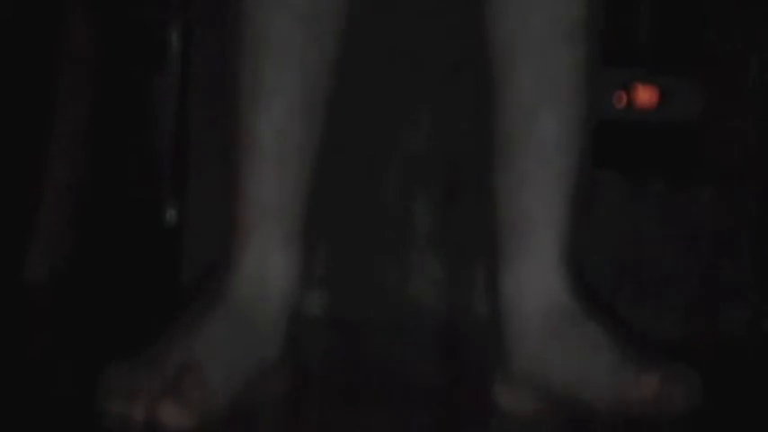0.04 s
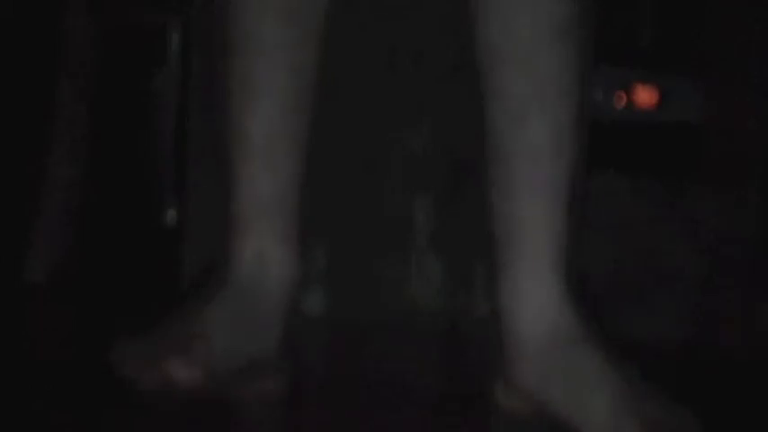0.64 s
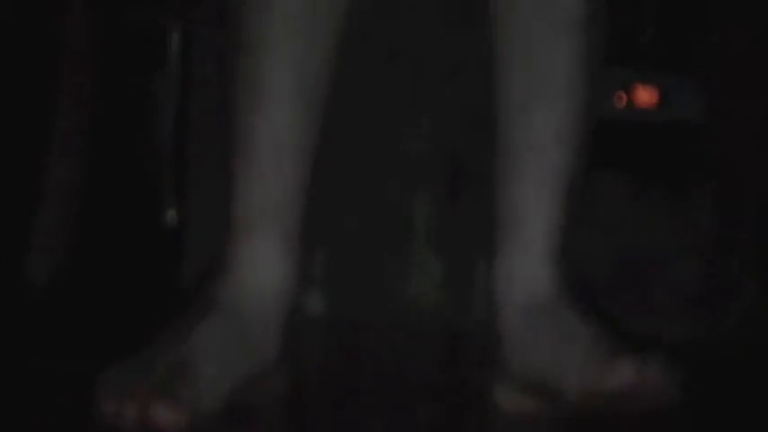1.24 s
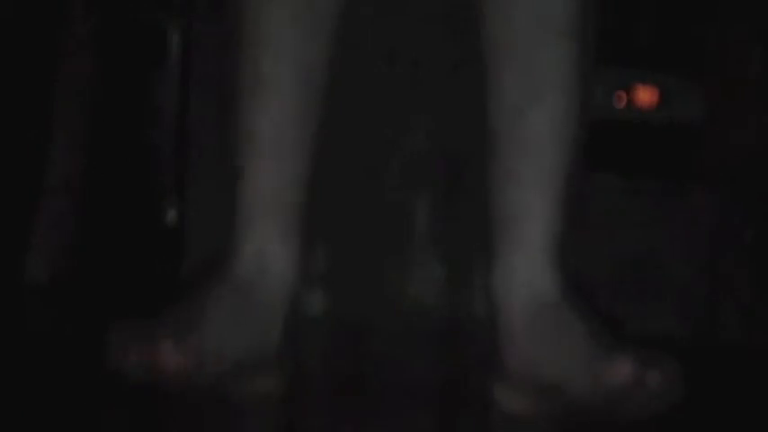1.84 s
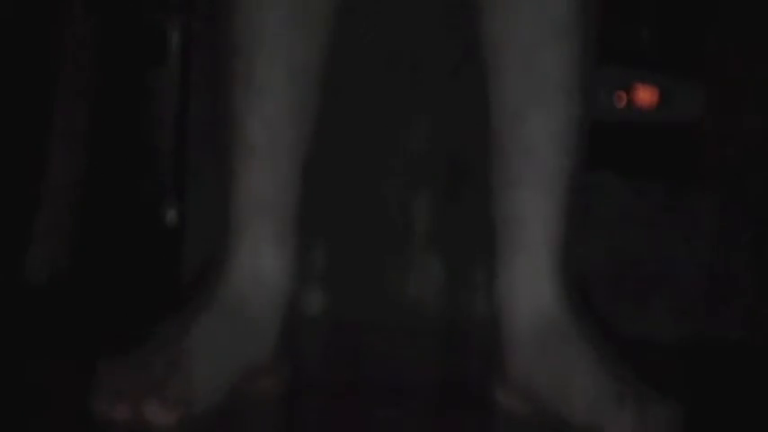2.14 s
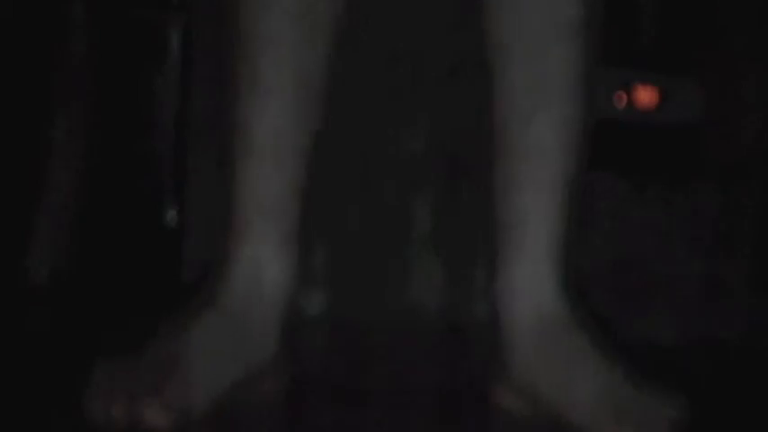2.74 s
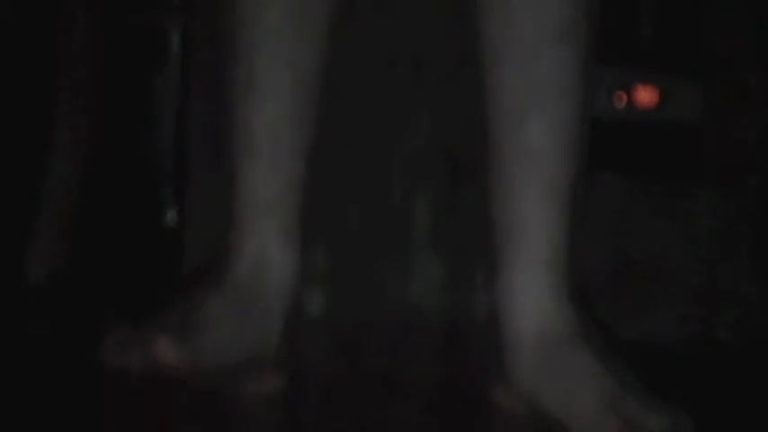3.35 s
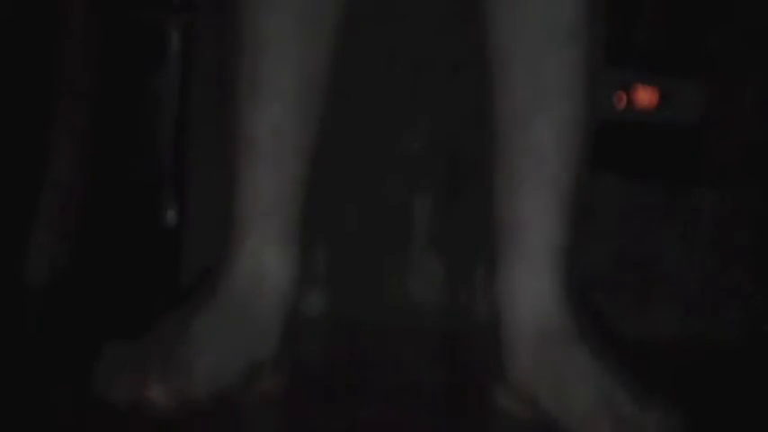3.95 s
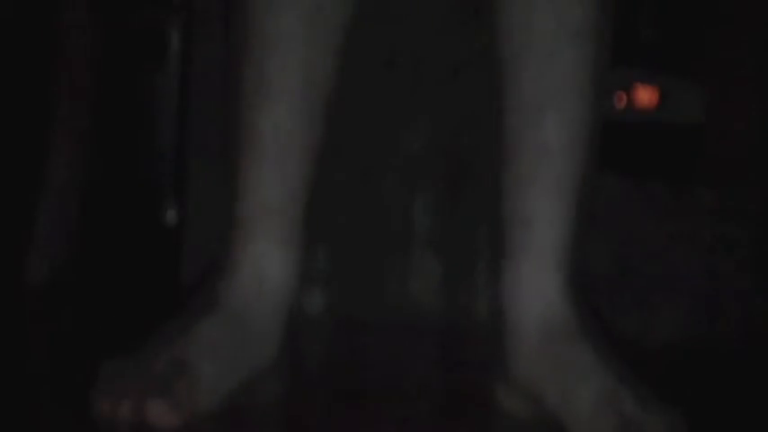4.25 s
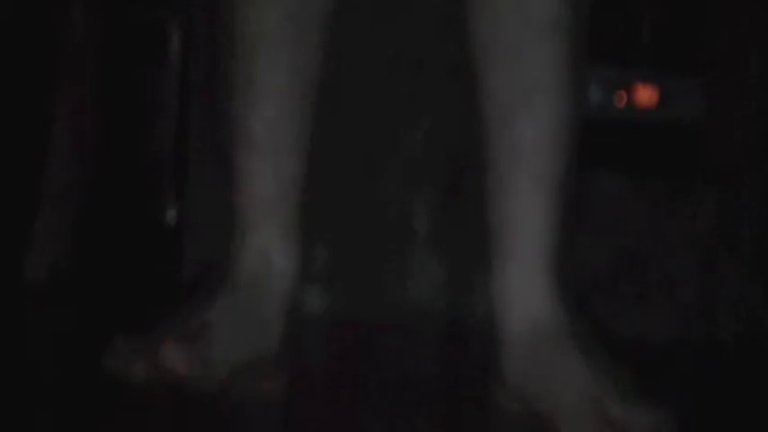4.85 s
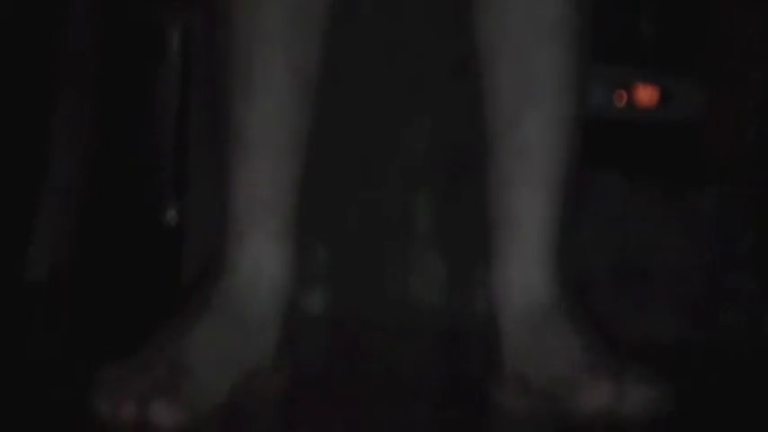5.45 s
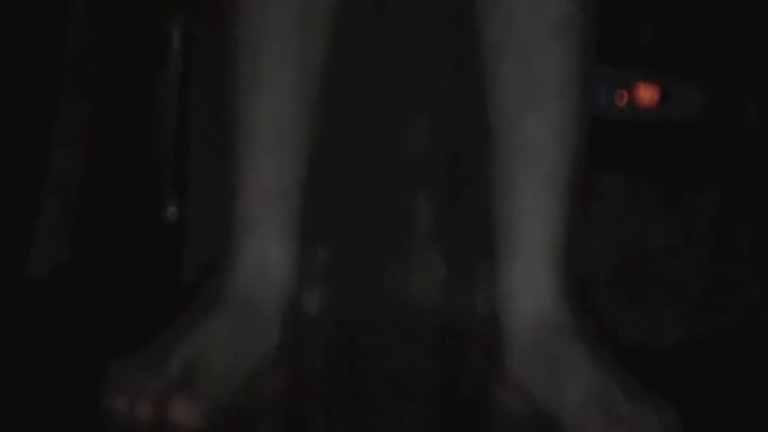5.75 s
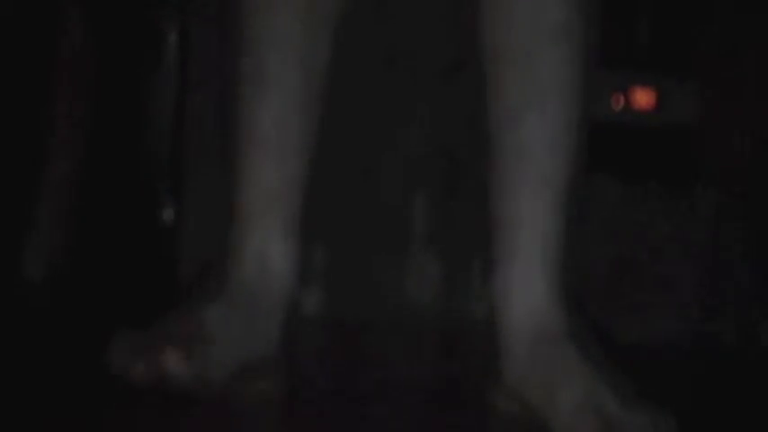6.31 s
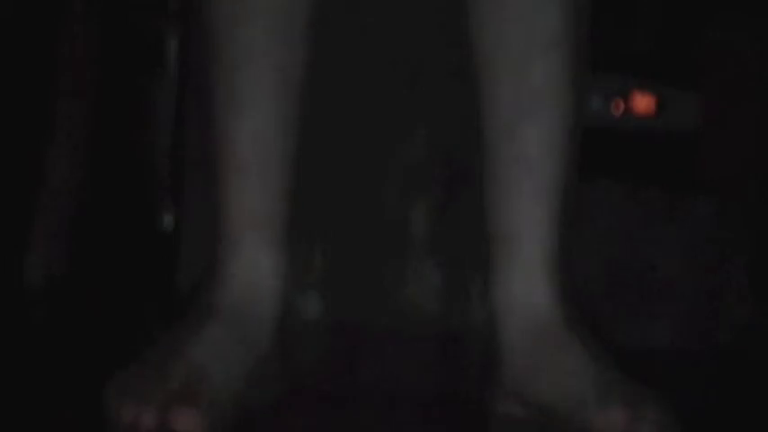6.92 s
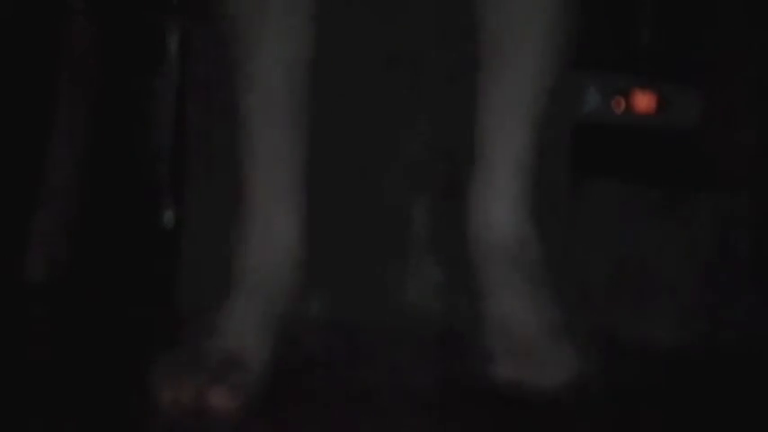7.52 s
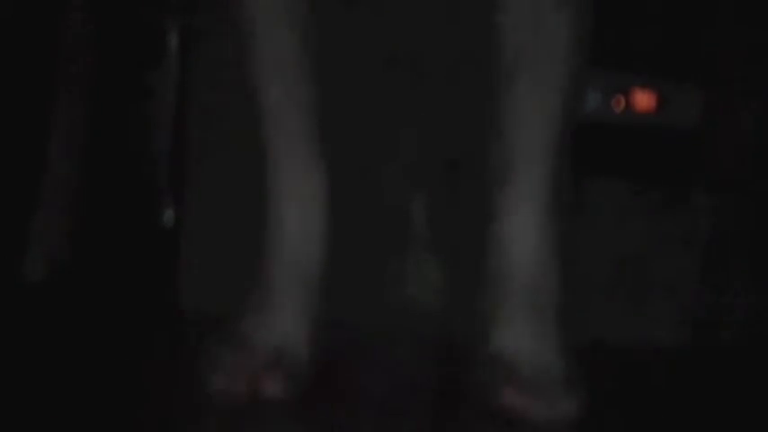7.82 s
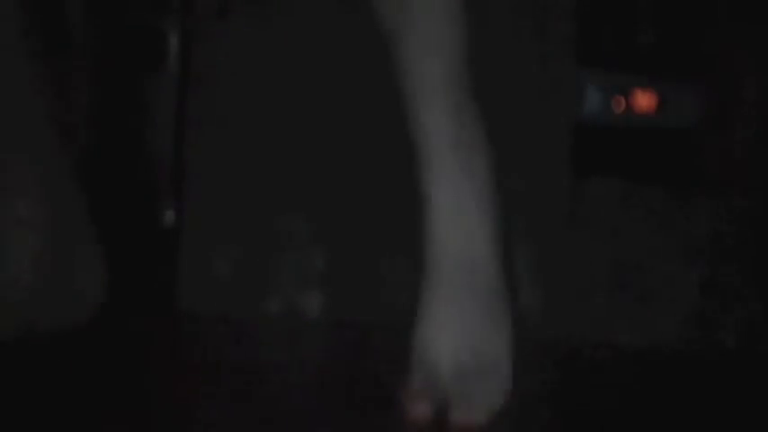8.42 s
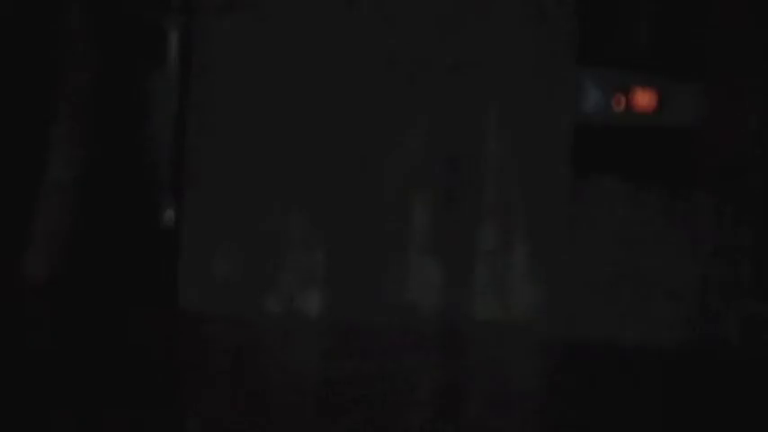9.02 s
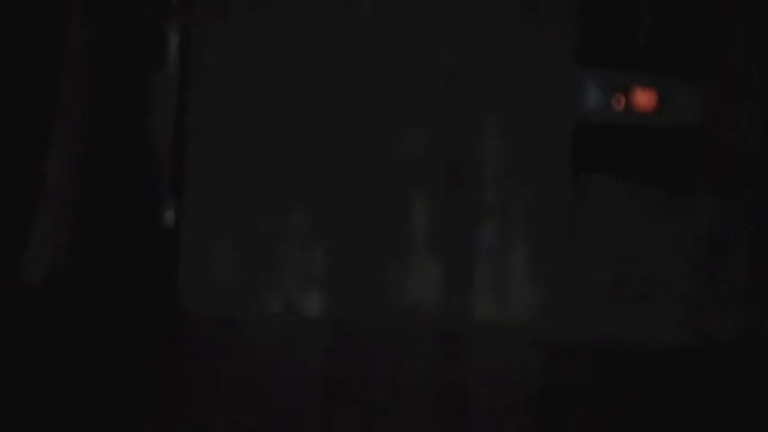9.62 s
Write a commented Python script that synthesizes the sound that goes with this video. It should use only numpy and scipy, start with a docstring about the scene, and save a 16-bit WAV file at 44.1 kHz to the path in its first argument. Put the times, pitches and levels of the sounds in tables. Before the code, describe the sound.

Light, uneven pats of bare feet in a small room give way to heavy footsteps walking away.

```python
"""Bare feet tap a hard floor in a small room, then walk off past the microphone with heavy heel thuds.
Each sole squeezes out a puff of air and shakes the floor; the skin smacks on the taps and brushes on the steps.
Near walls answer within milliseconds; the mono microphone hisses and whines faintly."""
import sys
import numpy as np
from scipy import signal
from scipy.fft import rfft, irfft, next_fast_len
from scipy.io import wavfile
from scipy.ndimage import uniform_filter1d

SR = 44100
rng = np.random.default_rng(int(sys.argv[2]) if len(sys.argv) > 2 else 0)


def unload_audio(sound):
    """Save the sound as a 16-bit wav file, at the path given as the first command line argument."""
    columns = np.transpose(np.atleast_2d(sound))
    # keep every value between -1 and 1, then stretch to whole-number steps
    steps = np.round(np.clip(columns, -1, 1) * 32767)
    wavfile.write(sys.argv[1], SR, steps.astype(np.int16))


N = 426447

# the sole lands flat and smacks: (s, skin click dB, clap of the arch dB, clap pitch Hz)
SMACKS = [(0.0511, -34.5, -43, 2200), (0.2825, -35.5, -70, 2700), (.547, -29.5, -44, 3600), (.617, -39.5, -66, 2500), (.9676, -28.5, -49, 3200),
          (1.2093, -26, -34, 5330), (1.403, -43, -51, 3730), (1.9649, -31.5, -41.5, 2700), (2.069, -38.5, -60, 1800),
          (2.1905, -30, -41, 4320), (2.428, -39, -54, 1900), (2.5037, -49, -52, 1800), (3.135, -36, -37.5, 3000),
          (3.5544, -26, -41, 3900), (3.8615, -40, -33, 2950), (4.2371, -55, -30, 4160), (4.6073, -44, -53, 2600),
          (4.9754, -31.5, -54, 3000), (5.4095, -29, -44, 2700), (5.6252, -43, -57, 2300), (6.4963, -43.5, -48, 2100)]
# skin brushing over the floor: (s at the peak, level dB, rise s, fall s, grip: low rasp against high hiss dB)
BRUSHES = [(7.038, -43.5, .005, .005, -3), (7.161, -34.5, 0.0009, .0045, -4.5), (7.336, -47, 0.005, 0.0098, 4), (7.36, -39, 0.0022, .01, -2),
           (7.42, -39.5, 0.0097, 0.0063, -3.5), (7.6, -31, .0006, 0.0067, -4.5), (7.635, -45.5, 0.021, 0.031, 9), (7.68, -42, .011, .01, -15),
           (7.786, -42, 0.0042, .0045, 1.5), (7.888, -38, .009, .004, -7), (7.92, -45, 0.017, .015, -2), (8.038, -38, 0.018, 0.012, -1),
           (8.206, -51, .006, 0.029, 3), (8.316, -42.5, 0.029, 0.024, 0), (8.423, -34, 0.00093, 0.0072, 0), (8.562, -43, 0.013, 0.033, -1),
           (8.673, -31, .0004, 0.021, -2), (8.909, -29.5, .0007, 0.027, -6.5), (8.965, -38.5, .0025, 0.02, -4.5),
           (9.13, -28, 0.0073, 0.0052, -15), (9.391, -33.5, .008, 0.017, -8), (9.447, -49.5, 0.011, 0.0056, 13.5)]
# modes of the floor and the room above it: (Hz, dB, t60 s)
FLOOR_MODES = [(73.4, 2, 0.25), (88.4, 1, 0.18), (120.3, -0.5, 0.14), (171.7, -4.5, 0.16), (194.8, -16.5, 0.48), (248.7, -2, 0.13), (284, -11, 0.24), (337.5, -6, 0.18), (402, -4.5, 0.12)]
# early reflections: (delay s, dB)
WALLS = [(.0038, -14), (.0072, -18), (0.0099, -27), (0.016, -15.5), (0.024, -41)]
# diffuse room sound: (Hz, dB against the direct sound, t60 s)
ROOM = [(40, -12, 0.45), (127, -11, 0.68), (279, -12, 0.16), (607, -10, 0.46), (1230, -5, 0.33), (2420, -3.5, 0.43), (4970, -9.5, 0.39), (8700, -7.5, 0.095), (15000, -8, 0.16)]
# steady background: (Hz, dB per Hz)
HISS = [(12, -21), (20, 8.5), (27, -5.5), (92, -8.5), (174, -4), (205, -6.5), (357, -11.5), (409, -9.5), (445, -9),
        (484, -13), (1020, -17.5), (1140, -17.5), (1550, -18), (3360, -18.5), (15000, -19.5)]
HISS_DB = -48.5
WHINE_HZ = 7867  # fixed
WHINE_DB = -65
CUTOFF_HZ = 15400  # fixed
TIME = np.arange(N) / SR
# the whole floor span bending under the weight: (Hz, dB, t60 s)
SAG_MODES = [(20.7, -5, 0.3), (37.4, -3.5, 0.4)]
# short, hollow ringing of the hard floor surface: (Hz, dB, t60 s)
SURFACE_MODES = [(599, -45, 0.11), (669, -45.5, 0.057), (1610, -41, 0.051), (1780, -47, 0.2), (2147, -55, 0.41), (3280, -77, 0.35), (3430, -50.5, 0.27), (3640, -51, 0.19), (4040, -72.5, 0.17)]
# the forefoot pats the floor: (s, air puff dB, weight dB)
TAPS = [(.0508, -12.5, -42.5), (0.283, -22, -40), (.546, -24.5, -50), (.618, -31, -39), (.966, -13.5, -46.5), (1.207, -15.5, -54),
        (1.404, -34, -41), (1.9645, -11, -42.5), (2.0691, -18.5, -39), (2.1877, -25.5, -41.5), (2.4285, -27.5, -41.5),
        (2.5038, -21.5, -58), (2.7787, -32.5, -51), (3.134, -17, -45.5), (3.5539, -16.5, -40.5), (3.7905, -30, -51.5), (3.8614, -9.5, -42),
        (4.188, -29.5, -51), (4.2366, -16.5, -40), (4.5498, -26, -46), (4.6074, -23.5, -48.5), (4.8862, -31.5, -51), (4.9738, -18, -48),
        (5.057, -33.5, -72), (5.4099, -16, -49.5), (5.623, -26.5, -52), (5.7689, -29, -50), (6.065, -23.5, -47.5), (6.197, -34, -58),
        (6.4942, -23, -54), (6.7934, -40, -51), (6.892, -51, -54.5), (7.1609, -31, -48), (7.325, -27, -64), (7.357, -28, -69),
        (7.4217, -13.5, -35.5), (7.6315, -15.5, -47), (7.7884, -23, -59), (7.8815, -11, -33), (8.024, -25, -49), (8.303, -30, -63),
        (8.349, -25, -47), (9.13, -26.5, -47)]
TAP_HZ, AIR_OVER_WEIGHT_DB, DB_PER_OCTAVE = 283.5, 24, 67   # pitch of a usual tap; an airier one is higher, a heavier one deeper
TAP_WEIGHT_DB, TAP_PATTER_DB, TAP_PATTER_GROWTH = -45, -43.5, 0.67   # a usual tap, the patter of its flesh, dB more per dB of weight
TAP_SAG_DB, SAG_GROWTH = -36.5, .6   # the floor sags fully under a usual tap, less under lighter ones
# a heel comes down: (s, air puff dB, puff pitch Hz, weight dB)
HEELS = [(1.748, -56, 130, -55), (7.2387, -14, 72, -30.5), (7.669, -34, 111, -34.5), (7.6891, -31, 120, -33), (8.06, -31, 83, -37.5), (8.12, -4, 187, -30.5),
         (8.3569, -20, 109, -34.5), (8.4266, -13.5, 142, -23.5), (8.5601, -17, 122, -22.5), (8.6778, -5.5, 158, -20),
         (8.9108, -27, 120, -21.5), (8.9783, -23, 84, -56), (9.162, -20.5, 204, -44), (9.395, -38, 150, -43)]
HEEL_WEIGHT_DB, HEEL_PATTER_DB, HEEL_PATTER_GROWTH = -20.5, -39.5, 2.9   # a full stride, its patter, dB more per dB of weight
HEEL_SAG_DB = -38
PATTER_WITH_AIR = 0.32   # dB of patter per dB of puff over weight: a flat landing patters more
# skin ticks as it peels off the floor: (s, dB)
PEELS = [(7.3569, -43), (7.6037, -33), (7.891, -35), (8.2342, -32), (8.9492, -34.5), (9.4825, -42)]
GRIP_DB = None
GRIP_FALL = None
CUSHION_FROM_DB, CUSHION_SLOPE = -42, 0.84   # above this clap, trapped air cushions the flesh: dB less patter per dB of clap
WALK_OFF_S = 7.5  # fixed
STIFF_FLOOR_DB = -3   # away from the standing spot the floor sags less
CLAP_DB = None
CLAP_HZ = None
CLAP_DB_PER_OCTAVE = None
ROLLED_LANDING_DB = 3.5   # a foot that rolls down without a smack patters this much less


def from_db(db):
    """Decibels to gain."""
    return 10 ** (np.asarray(db) / 20)


def rms_one(x):
    """Scale to unit power."""
    return x / np.sqrt(np.mean(x ** 2) + 1e-20)


def band(x, low_hz, high_hz, order=2):
    """Butterworth band-pass."""
    return signal.sosfilt(signal.butter(order, [low_hz, min(high_hz, .48 * SR)], "band", fs=SR, output="sos"), x)  # fixed


def at_hz(rows, hz, axis=1):
    """Read one column of a table on a log-frequency axis."""
    rows = np.array(rows)
    return np.interp(np.log(hz), np.log(rows[:, 0]), rows[:, axis])


def add(track, s, sound):
    """Mix a sound in from time s."""
    start = max(round(s * SR), 0)
    track[start:start + len(sound)] += sound[:N - start]


def ring(force, hz, t60):
    """A unit impulse sets a cosine of height 1 ringing; a steady force radiates nothing."""
    r, w = from_db(-60 / (t60 * SR)), 2 * np.pi * hz / SR  # fixed
    return signal.lfilter([.5, 0, -.5], [1, -2 * r * np.cos(w), r * r], force + 1e-18)


def puffs(swell=0.17, swell_s=0.005, ring_s=0.0029, ring_hz=300, soft_cycles=0.31, puff_db=2.5):
    """Pressure swells under the closing sole, flips at contact and swings out within a cycle or two."""
    out, t, lead = np.zeros(N), TIME[:SR // 10], TIME[SR // 50:0:-1]
    for s, db, hz, *_ in footfalls():
        slow = np.sqrt(ring_hz / hz)   # a deep puff builds and fades more slowly
        closing = -swell * slow * np.exp(-lead / (swell_s * slow)) * np.tanh(2 * np.pi * hz * lead / (swell * slow))
        swing = np.sin(2 * np.pi * hz * t) * np.exp(-t / (ring_s * slow))
        rounded = uniform_filter1d(np.concatenate([closing, swing]), max(int(soft_cycles * SR / hz), 1))   # soft flesh blunts the corner
        add(out, s - lead[0], from_db(db + puff_db) * rounded)
    return out


def thuds(push_cycles=0.53, push_lag_cycles=0.36, thud_db=6, sag_db=5, sag_s=0.0086, thud_low_hz=52):
    """The weight lands as a soft push, longer for a heel than for the toes; the floor rings and sags."""
    force, load, t = np.zeros(N), np.zeros(N), TIME[:SR // 20]
    bend = np.sin(np.pi * np.minimum(t / sag_s, 1)) ** 2
    for s, _, hz, push_db, load_db, _ in footfalls():
        length, hardest = push_cycles / hz, s + push_lag_cycles / hz
        push = np.sin(np.pi * np.minimum(t / length, 1)) ** 2
        add(force, hardest - length / 2, from_db(push_db + thud_db) * push / push.sum())
        add(load, hardest - sag_s / 2, from_db(load_db + sag_db) * bend / bend.sum())
    force = band(force + 1e-18, thud_low_hz, 6000)   # the floor radiates little below its lowest mode
    ringing = sum(from_db(db) * ring(force, hz, t60) for hz, db, t60 in FLOOR_MODES)
    return ringing + sum(from_db(db) * ring(load, hz, t60) for hz, db, t60 in SAG_MODES)


def pats(pat_db=6, fall_s=0.0053, low_hz=310, high_hz=800):
    """The flesh settles in a short dull patter after each contact."""
    out, t = np.zeros(N), TIME[:SR // 10]
    for s, *_, db in footfalls():
        add(out, s, from_db(db + pat_db) * rng.standard_normal(len(t)) * np.exp(-t / fall_s))
    patter = band(band(out + 1e-18, low_hz, high_hz, order=1), 206, 1460)
    return patter * np.sqrt(SR / 2 / (high_hz - low_hz))


def smacks(click_db=22, click_low_hz=1200, click_high_hz=11000, clap_db=28, clap_t60=0.00045, low_mode=0.58, low_share=0.16):
    """A sharp click of skin, and a clap from the air pocket under the arch."""
    clicks, claps, t = np.zeros(N), np.zeros(N), TIME[:SR // 50]
    for s, db in skin_clicks():
        add(clicks, s, [from_db(db + click_db)])
    for s, _, pocket_db, hz in SMACKS:
        pocket = np.cos(2 * np.pi * hz * t) + low_share * np.cos(2 * np.pi * hz * low_mode * t)   # two leaky air modes
        add(claps, s, from_db(pocket_db + clap_db) * pocket * np.exp(-np.log(1000) * t / clap_t60))
    return band(clicks + 1e-18, click_low_hz, click_high_hz, order=1), band(claps + 1e-18, 600, 12500, order=1)


def brushes(grain_db=5.5, hiss_low_hz=8500, rasp_low_hz=500, rasp_high_hz=7000, rasp_db=-3, rub_db=-4, rub_low_hz=250, rub_high_hz=750):
    """Dry skin slides with a fine, high hiss; where it grips, a lower rasp and a dull rub join in."""
    hiss, grip = np.zeros(N), np.zeros(N)
    t = TIME[:SR // 2] - TIME[SR // 4]
    for s, db, rise, fall, grip_db in BRUSHES:
        stroke = from_db(db) * np.exp(-np.where(t < 0, -t / rise, t / fall))
        add(hiss, s + t[0], stroke)
        add(grip, s + t[0], stroke * from_db(grip_db))
    grains = rng.standard_normal((3, N)) * from_db(grain_db * rms_one(uniform_filter1d(rng.standard_normal(N), size=30)))
    rasp = from_db(rasp_db) * rms_one(band(grains[1], rasp_low_hz, rasp_high_hz, order=1))
    rub = from_db(rub_db) * rms_one(band(grains[2], rub_low_hz, rub_high_hz))
    return hiss * rms_one(band(grains[0], hiss_low_hz, 17600)) + grip * (rasp + rub)


def reflections(x):
    """The direct sound and its first returns from near surfaces."""
    return x + sum(from_db(db) * np.interp(TIME - delay, TIME, x, left=0) for delay, db in WALLS)


def reverberation(x, build_s=0.0019):
    """Dense echoes build up and die away, band by band."""
    t, tail, edges = TIME[:SR // 2], 0, 30 * 2 ** np.arange(0, 9.6, .5)  # fixed
    for low, high in zip(edges, edges[1:]):
        hz = np.sqrt(low * high)
        decay = from_db(-60 * t / at_hz(ROOM, hz, axis=2))  # fixed
        echoes = band(rng.standard_normal(SR), low, high)[-len(t):] * decay * (1 - np.exp(-(t / build_s) ** 2))
        tail = tail + from_db(at_hz(ROOM, hz)) * rms_one(echoes) * np.sqrt(2 * (high - low) / SR / len(t))
    return signal.fftconvolve(x, tail)[:N]


def background():
    """Faint room rumble, microphone hiss and a thin electronic whine."""
    size = next_fast_len(N)
    hz = np.maximum(np.arange(size // 2 + 1) * SR / size, 1)
    noise = irfft(rfft(rng.standard_normal(size)) * from_db(at_hz(HISS, hz)) * (hz < CUTOFF_HZ), size)[:N]
    return from_db(HISS_DB) * rms_one(noise) + from_db(WHINE_DB) * np.sqrt(2) * np.sin(2 * np.pi * WHINE_HZ * TIME)


def crackles(crackle_db=3, spread_s=0.0013, low_hz=1500, high_hz=14000):
    """Around each smack the skin meets the floor in many tiny contacts."""
    out, t = np.zeros(N), TIME[:SR // 25] - TIME[SR // 50]
    for s, db in skin_clicks():
        add(out, s + t[0], from_db(db + crackle_db) * rng.laplace(0, .5, len(t)) * np.exp(-abs(t) / spread_s))
    return band(out + 1e-18, low_hz, high_hz, order=1)


def surface(contacts):
    """Sharp contacts set the hard surface ringing faintly."""
    return sum(from_db(db) * ring(contacts, hz, t60) for hz, db, t60 in SURFACE_MODES)


def sputters(sputter_db=8, fall_s=0.0015, spread=1.66):
    """Air escaping between the toes roughens each clap for a few milliseconds."""
    out, t = np.zeros(N), TIME[:SR // 25]
    for s, _, db, hz in SMACKS:
        air = rms_one(band(rng.standard_normal(len(t)), hz / max(spread, 1.1), hz * max(spread, 1.1)))
        add(out, s, from_db(db + sputter_db) * air * np.exp(-t / fall_s))
    return out


def footfalls():
    """Every landing as (s, puff dB, puff Hz, thud dB, sag dB, patter dB); pitch, sag and patter follow air and weight."""
    rows = []
    for s, air, weight in TAPS:
        airy, heavy = air - weight - AIR_OVER_WEIGHT_DB, weight - TAP_WEIGHT_DB
        patter = TAP_PATTER_DB + TAP_PATTER_GROWTH * heavy + PATTER_WITH_AIR * airy - cushion(s)
        sag = TAP_SAG_DB + SAG_GROWTH * min(heavy, 0) + STIFF_FLOOR_DB * (s > WALK_OFF_S)
        rows.append((s, air, TAP_HZ * 2 ** (airy / DB_PER_OCTAVE), weight, sag, patter))
    for s, air, hz, weight in HEELS:
        patter = HEEL_PATTER_DB + HEEL_PATTER_GROWTH * (weight - HEEL_WEIGHT_DB) + PATTER_WITH_AIR * (air - weight)
        rows.append((s, air, hz, weight, HEEL_SAG_DB + STIFF_FLOOR_DB * (s > WALK_OFF_S), patter))
    return rows


def skin_clicks():
    """Skin clicks when it lands flat and when it peels off: (s, dB)."""
    return [(s, db) for s, db, *_ in SMACKS] + list(PEELS)




def cushion(s):
    """By how many dB the landing at time s is softened, by rolling down or by air trapped under a clapping sole."""
    claps = [db for when, _, db, _ in SMACKS if abs(when - s) < .02]  # fixed
    return CUSHION_SLOPE * max(claps[0] - CUSHION_FROM_DB, 0) if claps else ROLLED_LANDING_DB


def scene(clap_direct_db=-13, clap_wall_db=-11, clap_wall_s=.0101, puff_low_hz=45):
    """The clap shoots out sideways from under the foot, so it is heard mostly by way of a wall and the room."""
    clicks, claps = smacks()
    patter = pats()
    air = band(puffs() + 1e-18, puff_low_hz, 6000, order=1)   # a sole is too small to radiate the deepest bass
    feet = air + patter + clicks + sputters() + brushes()
    near = reflections(feet + crackles() + from_db(clap_direct_db) * claps)
    bounce = from_db(clap_wall_db) * band(np.interp(TIME - clap_wall_s, TIME, claps, left=0), 1700, 3900)   # the wall returns only the middle range
    mono = near + bounce + reverberation(feet + claps) + surface(claps + patter) + thuds() + background()
    return np.stack([mono, mono])


def record(dry):
    """The recorder adds a small steady offset and cuts the top."""
    offset = -.003  # fixed
    return signal.sosfilt(signal.ellip(10, .1, 70, CUTOFF_HZ, fs=SR, output="sos"), dry) + offset


dry = scene()
out = record(dry)
unload_audio(out)
```